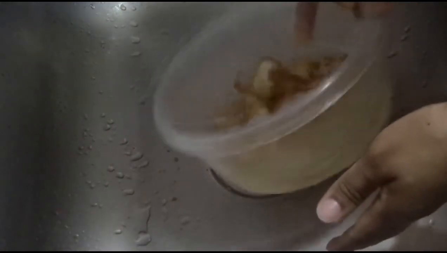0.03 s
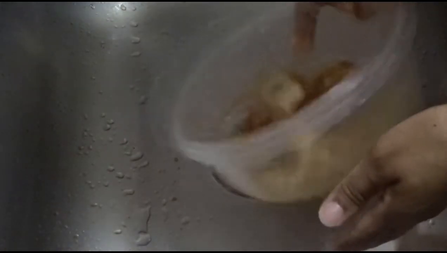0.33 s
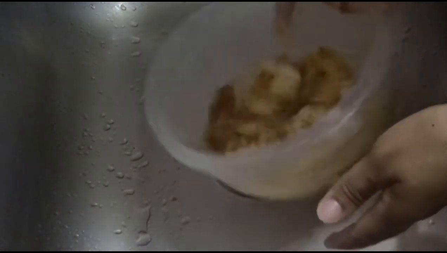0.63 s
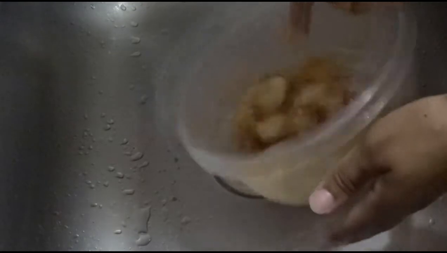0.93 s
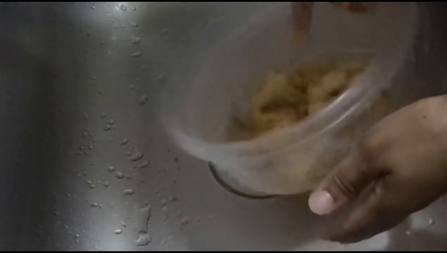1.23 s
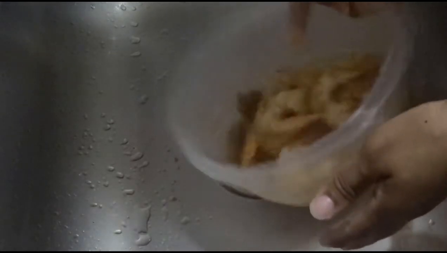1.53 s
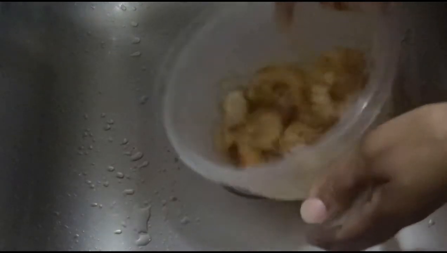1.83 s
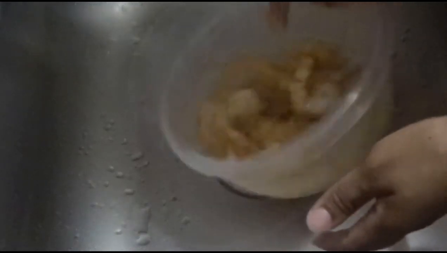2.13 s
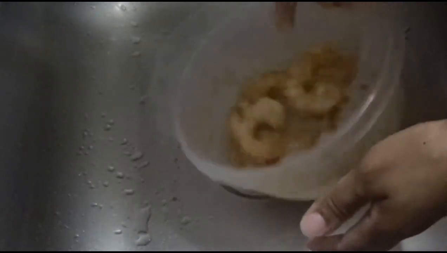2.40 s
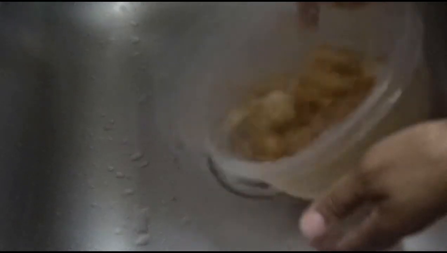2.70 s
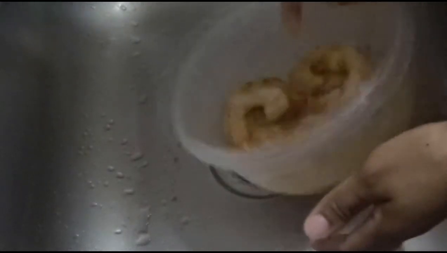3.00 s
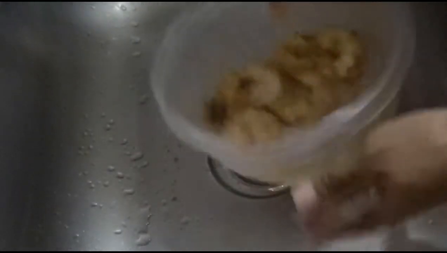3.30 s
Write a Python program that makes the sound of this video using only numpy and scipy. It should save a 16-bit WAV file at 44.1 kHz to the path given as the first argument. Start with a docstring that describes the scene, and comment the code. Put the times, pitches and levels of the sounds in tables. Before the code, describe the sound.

Shrimp shaken in a thin plastic tub, with wet crackles, shell clicks and soft thumps.

```python
"""A steel sink in a small kitchen: wet shrimp are tossed quickly in a thin plastic tub held inside it.
Each toss lands as a swell of wet crackle that rings the hollow of the tub; shells clack on the wall,
the pile thumps the bottom and little air pockets plop. The shaking stops shortly before the end
and leaves a steady hiss like running water."""
import sys
import numpy as np
from scipy import signal
from scipy.fft import rfft, irfft, next_fast_len
from scipy.io import wavfile
from scipy.ndimage import uniform_filter1d

SR = 44100
rng = np.random.default_rng(int(sys.argv[2]) if len(sys.argv) > 2 else 0)


def output_pcm(signal):
    """Save a mono or channel-first signal as 16-bit PCM at the path in sys.argv[1].

    Samples are clipped to [-1, 1] before scaling.
    """
    pcm = np.clip(np.atleast_2d(signal).T, -1, 1) * 32767
    wavfile.write(sys.argv[1], SR, np.round(pcm).astype(np.int16))


N = 156555


def undb(db):
    """Decibels to gain."""
    return 10 ** (np.asarray(db) / 20)


def noise():
    """White noise for the whole scene."""
    return rng.standard_normal(N)


def wander(rate_hz):
    """Smooth random drift with a spread near 1."""
    hold = max(int(SR / rate_hz), 1)
    return 1.17 * uniform_filter1d(np.repeat(noise()[:N // hold + 1], hold), hold)[:N]


def eq_gains(curve, size):
    """Gains of a (frequency [Hz], level [dB]) curve on the bins of an FFT."""
    hz, db = np.array(curve, float).T
    return undb(np.interp(np.log(np.fft.rfftfreq(size, 1 / SR) + 1), np.log(hz), db))


def colour(x, curve):
    """Minimum-phase EQ that keeps the power of white noise."""
    size = 2048
    cepstrum = irfft(np.log(eq_gains(curve, size)))
    cepstrum[1:size // 2] *= 2
    cepstrum[size // 2 + 1:] = 0
    impulse = irfft(np.exp(rfft(cepstrum)))
    return signal.fftconvolve(x, impulse / np.linalg.norm(impulse))[:len(x)]


def resonate(x, peaks):
    """A bank of resonators in alternating polarity that keeps the power of white noise."""
    t = np.arange(SR // 4) / SR
    impulse = np.zeros(len(t))
    for k, (hz, width, db) in enumerate(peaks):
        decay = undb(db) * np.sqrt(width) * np.exp(-np.pi * width * t)
        impulse += (-1) ** k * decay * np.cos(2 * np.pi * hz * t)
    return signal.fftconvolve(x, impulse / np.linalg.norm(impulse))[:N]


def plastic_hit(modes, t, focus_hz, focus_octaves, detune=0.044):
    """One blow on flexing plastic, peak 1: modes near the focus speak most, retuned a little each hit."""
    hz, db, t60 = np.array(modes, float).T[:, :, None]
    focus = 1 / (1 + (np.log2(hz / focus_hz) / focus_octaves) ** 2)
    hz = hz * (1 + detune * rng.standard_normal(hz.shape))
    partials = focus * undb(db - 60 * t / t60) * np.sin(2 * np.pi * hz * t)
    hit = np.sum(partials * rng.choice([-1, 1], hz.shape), axis=0)
    return hit / np.abs(hit).max()


def add(track, time, sound):
    """Drop a sound on the track at a time in seconds."""
    start = int(np.clip(time * SR, 0, N - 1))
    track[start:start + len(sound)] += sound[:N - start]


def shell_crackle(clicks_per_s=3600, spread_db=5, ceiling_db=15.5, patchy_db=3):
    """Dense tiny clicks of wet shells touching and parting, rms 1."""
    sizes = undb(np.minimum(spread_db * rng.exponential(size=N), ceiling_db))
    contacts = rng.random(N) < clicks_per_s / SR
    clicks = contacts * sizes * np.sign(noise()) * undb(patchy_db * wander(140))
    return clicks / np.sqrt(np.mean(clicks ** 2))


# Swells as the pile lands (crest time [s], level [dB], rise [s], fall [s], spray trim [dB])
LANDINGS = [(0.005, -37.5, 0.012, 0.011, 3), (0.124, -36, 0.01016, 0.0085, 5),
            (0.206, -37.5, 0.01, 0.011, 8.5), (0.267, -22, 0.0081, 0.0053, -1),
            (0.314, -38, 0.0097, 0.022, 10), (0.407, -29, .018, 0.0052, 8),
            (0.509, -30, 0.0084, 0.014, -12), (0.582, -37.5, 0.031, 0.004, -4),
            (0.644, -28.5, 0.01, 0.006, 9.5), (0.758, -28.5, 0.013, 0.02, 1),
            (0.832, -37.5, 0.034, 0.0058, 8), (0.903, -28, 0.016, 0.012, 5),
            (1.028, -24.5, 0.013, 0.0047, 5), (1.152, -27.5, 0.0084, 0.01, 7),
            (1.232, -31.5, 0.0059, 0.0039, 7), (1.277, -30, 0.0041, 0.031, -5),
            (1.401, -28, 0.007, 0.0093, -2), (1.541, -30.5, 0.01, 0.03, 3), (1.663, -33, .011, 0.0082, -6),
            (1.750, -38.5, 0.022, 0.0082, 14), (1.786, -32, 0.0029, 0.036, 4),
            (1.926, -31.5, 0.016, .025, 6.5), (2.003, -32, 0.0056, 0.013, -4),
            (2.077, -31.5, 0.03, 0.016, 7.5), (2.160, -32, 0.0063, 0.01, -5),
            (2.233, -24.5, .014, 0.0087, 3), (2.300, -37.5, .01, 0.0091, 0),
            (2.371, -27, 0.016, 0.0074, 2.5), (2.496, -33.5, 0.011, 0.018, 13.5),
            (2.593, -39, 0.0046, 0.011, 2), (2.623, -32.5, .003, 0.0084, 15.5),
            (2.642, -29, 0.0089, 0.014, 6), (2.728, -35, 0.0082, 0.0048, -9),
            (2.788, -33.5, 0.016, 0.0064, 11.5), (2.823, -34.5, 0.013, 0.049, 10),
            (2.943, -29.5, 0.012, 0.0087, 6), (3.077, -35, 0.016, 0.0096, 5.5),
            (3.165, -37.5, 0.017, .014, -6), (3.225, -36, .01, 0.017, 0), (3.258, -33, 0.013, 0.011, 0)]
# Fader ride on the sliding between landings (time [s], level [dB])
SLIDE_RIDE = [(0, -44.5), (.23, -47.5), (.45, -40.5), (.85, -40), (1.1, -37), (1.45, -42), (1.7, -41.5),
              (2.2, -39.5), (2.7, -40.5), (2.9, -46), (3.1, -39.5), (3.26, -57.5), (3.32, -58), (3.42, -79),
              (3.48, -53), (3.55, -52.5)]
# Wet midrange body of the crackle (frequency [Hz], level [dB])
SQUELCH_EQ = [(40, -29), (100, -19.5), (250, -15.5), (450, -8), (560, -12), (800, -7.5), (1100, -12),
              (1400, -2), (1900, -6.5), (2400, -1), (3000, -2), (4000, -6), (6000, -11.5), (11000, -22)]
# Fine, fizzy top of the crackle (frequency [Hz], level [dB])
SPRAY_EQ = [(100, -41), (2500, -19), (5000, 3), (7000, -5.5), (9000, 0.5), (11500, -8.5)]
# Air ringing in the tub (frequency [Hz], bandwidth [Hz], level [dB])
TUB_HOLLOW = [(649, 57, 2.5), (741.5, 59, -0.5)]


def tossed_pile(landing_db=1.5, landing_spray_db=-14.5, slide_spray_db=-9, hollow_db=-42):
    """The shrimp slide and land: squelch, fine spray, and the hollow of the tub swelling with them."""
    t = np.arange(N) / SR
    body_power = undb(np.interp(t, *np.array(SLIDE_RIDE).T)) ** 2
    spray_power = body_power * undb(slide_spray_db) ** 2
    for time, db, rise, fall, spray_db in LANDINGS:
        swell = undb(db + landing_db) * np.exp(-np.maximum((time - t) / rise, (t - time) / fall))
        body_power += swell ** 2
        spray_power += (swell * undb(landing_spray_db + spray_db)) ** 2
    body = np.sqrt(body_power)
    hollow_drive = undb(hollow_db) * (body / undb(-34)) ** 0.75  # compressed around -34 dB
    squelch = colour(body * shell_crackle(), SQUELCH_EQ)
    spray = colour(np.sqrt(spray_power) * shell_crackle(), SPRAY_EQ)
    hollow = resonate(hollow_drive * shell_crackle(), TUB_HOLLOW)
    return squelch + spray + hollow


# Tone of the hiss bed (frequency [Hz], level [dB])
HISS_EQ = [(25, -7), (50, -17), (92, -13), (135, -11), (240, -14), (480, -12), (850, -13.5), (945, -1),
           (1040, -9.5), (1160, -16.5), (1400, -11.5), (2450, -10.5), (5000, -16), (9200, -20),
           (11000, -23.5)]
# Hum and ringing bands in the bed (frequency [Hz], bandwidth [Hz], level [dB])
HISS_RESONANCES = [(91.3, 15, -0.5), (131, 18, -12), (1563, 86, 5.5), (2550, 265, 7.5)]


def hiss_bed(hiss_db=-47.5, flicker_db=3, resonance_db=-54):
    """A steady, lightly flickering hiss like running water, with a low hum under it."""
    hiss = undb(hiss_db + flicker_db * wander(24.65)) * colour(noise(), HISS_EQ)
    return hiss + undb(resonance_db) * resonate(noise(), HISS_RESONANCES)


# Shells hitting the wall (time [s], level [dB], focus [Hz], snap trim [dB], ring length [ratio])
SHELL_HITS = [(0.0613, -21, 3080, -13, 0.89), (0.1225, -16, 3600, -24, 0.74),
              (0.2575, -12.5, 3640, -11, 1.4), (0.2653, -10, 1730, -28, 1.3),
              (0.268, -13.5, 1790, -13, 0.99), (0.274, -14.5, 2180, -26, 0.57),
              (0.309, -21.5, 2240, -12, 1.1), (0.369, -26, 3000, -22, 0.68), (0.393, -24, 2740, -17, 0.41),
              (0.4059, -8.5, 3270, -22, 0.49), (0.5083, -8.5, 3400, -20, 0.32),
              (0.5838, -19, 3420, -7, 0.88), (0.650, -16, 2410, -27, 1.1), (0.707, -29, 3000, -15, .6),
              (0.758, -18.5, 3200, -16, 0.46), (0.7663, -15, 2220, -23, 1.5),
              (0.8933, -12.5, 3430, -5.5, .4), (0.9071, -19, 2680, -10, .8), (1.0242, -15, 2300, -16, 0.2),
              (1.0302, -18, 4500, 3.5, .7), (1.0375, -6, 2220, -27, 0.79), (1.0888, -11.5, 3200, -10, 0.17),
              (1.1367, -14, 2650, -16, 0.42), (1.151, -11, 3560, -8.5, 0.58), (1.264, -5, 2310, -27, 0.61),
              (1.2759, -15, 2840, -13, 0.69), (1.3126, -13.5, 2670, -15, 0.66), (1.328, -17, 2700, -11, .6),
              (1.3636, -21, 2900, -16, 0.81), (1.400, -17.5, 2300, -26, 0.66),
              (1.4782, -19.5, 2580, -12, 0.78), (1.5671, -19, 1300, -24, .8), (1.589, -19, 2600, -24, .6),
              (1.654, -22, 2890, -14, 0.4), (1.666, -13, 3070, -28, 0.64), (1.749, -17.5, 2570, -22, 0.87),
              (1.7834, -18, 5040, -5.5, .8), (1.8234, -21, 3020, -15, 1.2), (1.9323, -17, 2940, -21, 0.49),
              (2.08, -12, 2580, -24, .9), (2.1008, -9.5, 2630, -13, 1.2), (2.123, -19, 2360, -10, 0.55),
              (2.248, -7.5, 2280, -22, 1.26), (2.3649, -14, 3800, -6.5, 0.58),
              (2.379, -17.5, 4960, -3, 0.52), (2.422, -12.5, 1620, -13, 0.77), (2.4843, -15, 2850, -15, .6),
              (2.4958, -8, 1420, -14, 1.5), (2.523, -8, 2420, -18, 0.97), (2.5665, -24, 3800, -18, 0.58),
              (2.59, -7.5, 2240, -22, 1.2), (2.6403, -9.5, 2360, -20, 1.5), (2.6445, -12, 2610, -22, 1.1),
              (2.6732, -11.5, 2870, -12, 1.1), (2.7915, -6, 3280, -11, 0.93),
              (2.8145, -11.5, 2700, -9, 1.3), (2.9347, -11.5, 2900, -8, 0.74), (2.948, -11, 2270, -22, 1.3),
              (2.98, -23, 2400, -25, 0.85), (2.998, -9.5, 3150, -21.5, 0.6)]
# Ring of the thin plastic wall (frequency [Hz], level [dB], t60 [s])
WALL_MODES = [(1230, -11.5, 0.0056), (1497, -6.5, 0.019), (1870, -3, .01), (2277, 0.5, .019),
              (2672, 2.5, .013), (3070, 0, 0.013), (3728, 0.5, 0.021), (4430, -2.5, 0.019),
              (5560, 0, 0.0056)]
# Bright edge of a shell's attack (frequency [Hz], level [dB])
SNAP_EQ = [(100, -38), (1500, -17), (3500, -3), (5500, 5.5), (8000, -2), (11000, -6.5)]


def shell_clacks(trim_db=-1, snap_db=0.5, snap_s=0.0016, rattle_db=-20.5, rattle_s=0.0026):
    """A shell snaps against the wall and rattles; where it lands decides which modes speak."""
    t = np.arange(SR // 20) / SR
    wall, snap, rattle = np.zeros((3, N))
    for time, db, focus_hz, snap_trim_db, ring_length in SHELL_HITS:
        gain = undb(db + trim_db)
        modes = np.array(WALL_MODES) * [1, 1, ring_length]
        add(wall, time, gain * plastic_hit(modes, t, focus_hz, focus_octaves=0.55))
        snap_noise, rattle_noise = rng.standard_normal((2, len(t)))
        add(snap, time, gain * undb(snap_db + snap_trim_db) * snap_noise * np.exp(-t / snap_s))
        add(rattle, time, gain * undb(rattle_db) * rattle_noise * np.exp(-t / rattle_s))
    return wall + colour(snap, SNAP_EQ) + colour(rattle, SQUELCH_EQ)


# The pile dropping on the bottom (time [s], level [dB], focus [Hz])
BOTTOM_HITS = [(0.124, -28.5, 165), (0.269, -7.5, 334), (0.404, -20, 255), (0.505, -56, 394),
               (0.759, -16, 286), (0.830, -21.5, 390), (0.902, -21.5, 242), (0.916, -30, 95),
               (1.027, -19, 366), (1.145, -18, 330), (1.277, -23.5, 284), (1.312, -32, 250),
               (1.400, -27.5, 121), (1.660, -31, 400), (2.017, -11.5, 285), (2.075, -25, 250),
               (2.101, -22, 168), (2.160, -29, 222), (2.222, -24, 400), (2.3, -33, 110), (2.370, -32, 350),
               (2.590, -16.5, 330), (2.630, -52, 400), (2.792, -33, 248), (2.936, -20, 377),
               (3.160, -20, 400), (3.220, -24.5, 420), (3.258, -24, 300)]
# Low ring of the tub's bottom (frequency [Hz], level [dB], t60 [s])
BOTTOM_MODES = [(84, -4, 0.15), (166, -5, 0.05), (257.6, -3.5, 0.093), (357, -3, 0.031), (433, 6.5, 0.03),
                (527, -1.5, 0.02), (850, 11, 0.0067)]
# Dull smack of the wet mass (frequency [Hz], level [dB])
SLAP_EQ = [(60, -25), (150, -17), (260, -17), (650, 1.5), (1100, -24), (6000, -13)]


def bottom_thumps(boom_db=-12.5, slap_db=-19, slap_s=0.0077):
    """The soft mass slaps the bottom of the tub, which answers with a short boom."""
    t = np.arange(SR // 6) / SR
    boom, slap = np.zeros((2, N))
    for time, db, focus_hz in BOTTOM_HITS:
        add(boom, time, undb(db + boom_db) * plastic_hit(BOTTOM_MODES, t, focus_hz, focus_octaves=0.62))
        add(slap, time, undb(db + slap_db) * rng.standard_normal(len(t)) * np.exp(-t / slap_s))
    return boom + colour(slap, SLAP_EQ)


# Air popping between wet shrimp (time [s], level [dB], starting pitch [Hz], t60 [s])
AIR_POCKETS = [(0.198, -33, 650, 0.046), (0.503, -24.5, 647, 0.069), (0.636, -29, 650, 0.024),
               (0.890, -27, 672, 0.11), (1.567, -24, 1010, 0.0093), (1.795, -31, 704, 0.076),
               (2.222, -25, 685, 0.033), (2.325, -23, 652, 0.032), (2.622, -25, 664, 0.033),
               (2.728, -25.5, 717, 0.029), (2.950, -32, 667, 0.056), (3.003, -30, 641, 0.098),
               (3.160, -28, 720, 0.057), (3.257, -29, 650, 0.048)]


def air_plops(trim_db=-4, attack_s=0.0021, glide_per_s=2.3):
    """Small air pockets pop, ring briefly and bend up in pitch."""
    t = np.arange(SR // 10) / SR
    plops = np.zeros(N)
    for time, db, hz, t60 in AIR_POCKETS:
        envelope = (1 - np.exp(-t / attack_s)) * undb(-60 * t / t60)
        chirp = np.sin(2 * np.pi * hz * t * (1 + glide_per_s * t / 2))
        add(plops, time, undb(db + trim_db) * envelope / envelope.max() * chirp)
    return plops


def reverb(x, t60_s, predelay_s):
    """A diffuse tail of unit power that starts after the predelay."""
    t = np.arange(SR // 2) / SR
    tail = rng.standard_normal(len(t)) * undb(-60 * t / t60_s) * (t > predelay_s)
    return signal.fftconvolve(x, tail / np.linalg.norm(tail))[:N]


def sink_reflections(x, t60_s, predelay_s, paths=5):
    """Close reflections off the steel, crossfaded at random for the swing of the tub."""
    fades = np.array([wander(14) for _ in range(paths)])
    fades /= np.sqrt(np.sum(fades ** 2, axis=0))
    return sum(fade * reverb(x, t60_s, predelay_s) for fade in fades)


# Stereo width, as side against mid (frequency [Hz], level [dB])
SIDE_EQ = [(100, -20), (500, -15), (1200, -7), (2500, -14), (3800, -7), (5500, -1), (10000, -0.5)]


def widen(mid):
    """Treble reaches the two sides by different, shifting paths; the bass stays centred."""
    size = next_fast_len(N + SR // 10)
    scattered = sink_reflections(mid, t60_s=0.018, predelay_s=0)
    side = irfft(rfft(scattered, size) * eq_gains(SIDE_EQ, size), size)[:N]
    return np.array([mid + side, mid - side])


def scene():
    """The tub between steel walls in a small kitchen, over the hiss bed."""
    tub = tossed_pile() + shell_clacks() + bottom_thumps() + air_plops()
    sink = undb(-6) * sink_reflections(tub, t60_s=0.064, predelay_s=0.0015)
    kitchen = undb(-15) * reverb(tub, t60_s=0.22, predelay_s=0.012)
    balance = undb([[0.275], [-0.275]])  # a touch to the left
    return widen(tub + sink + kitchen + hiss_bed()) * balance


def record(dry):
    """A steep low-pass takes off the air above 11 kHz."""
    return signal.sosfilt(signal.ellip(10, 0.2, 80, 11000, fs=SR, output="sos"), dry)


dry = scene()
out = record(dry)
output_pcm(out)
```